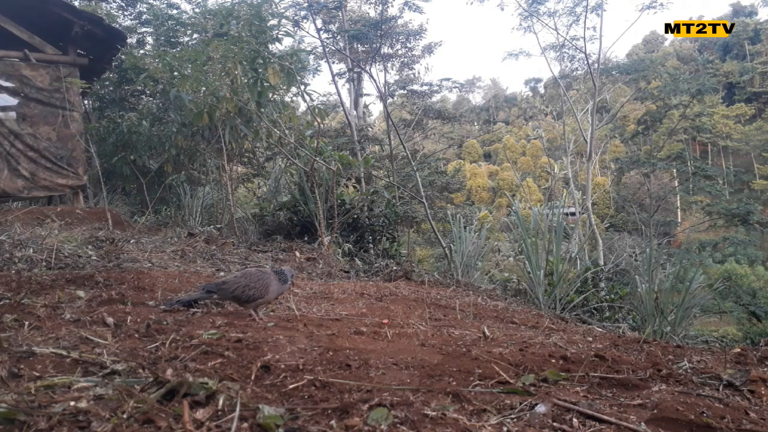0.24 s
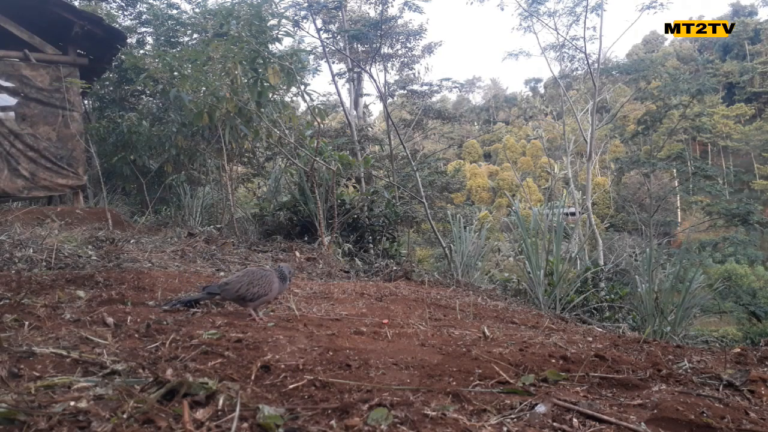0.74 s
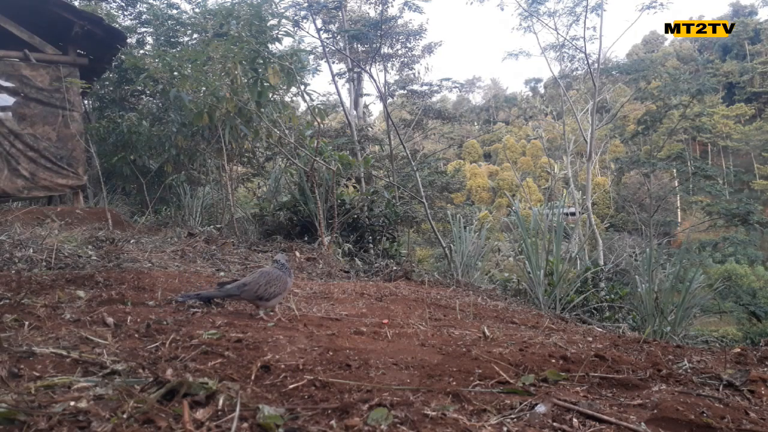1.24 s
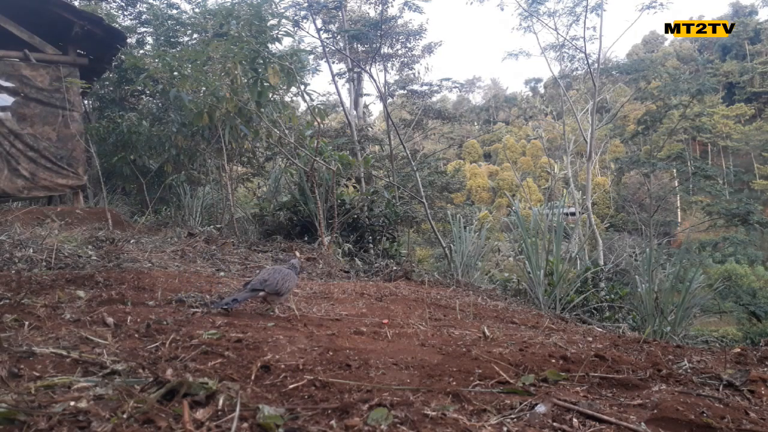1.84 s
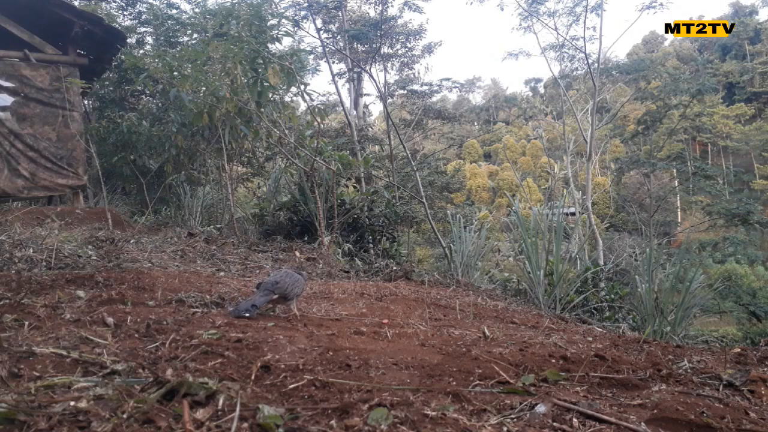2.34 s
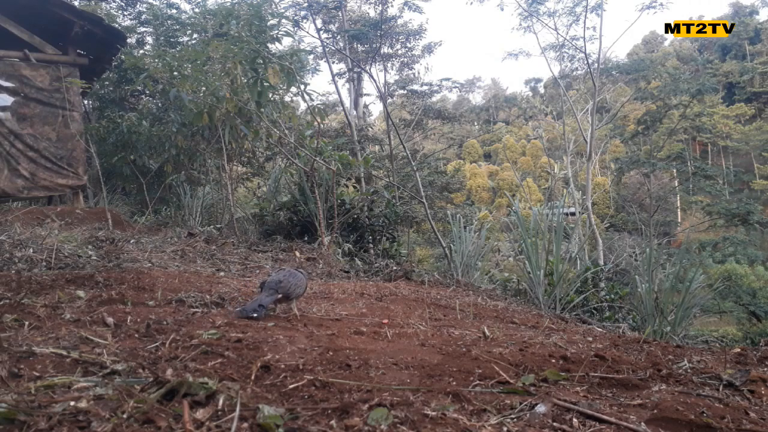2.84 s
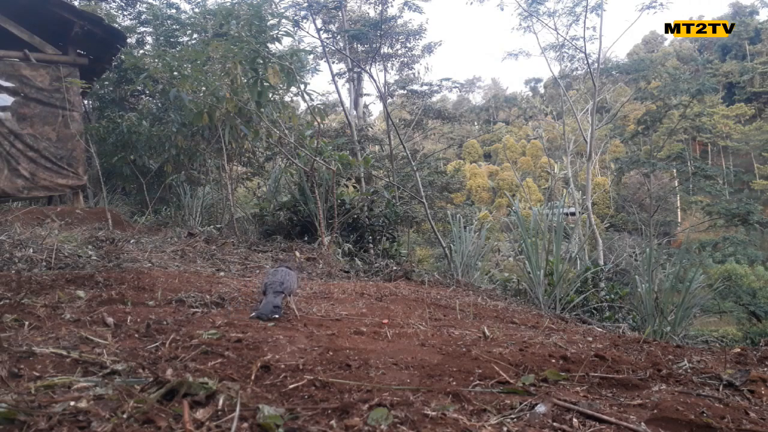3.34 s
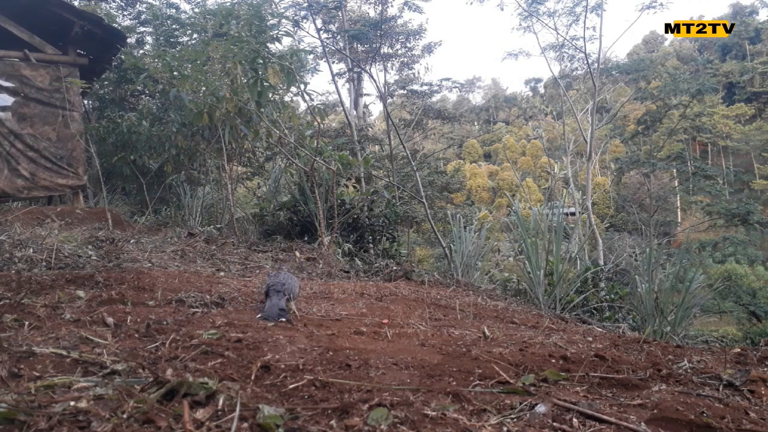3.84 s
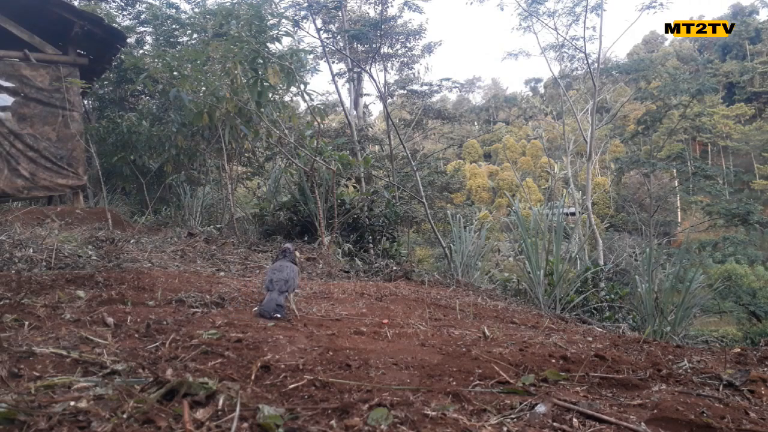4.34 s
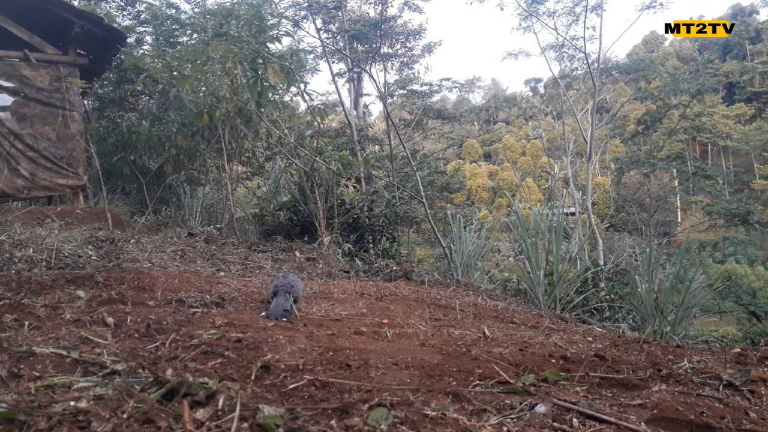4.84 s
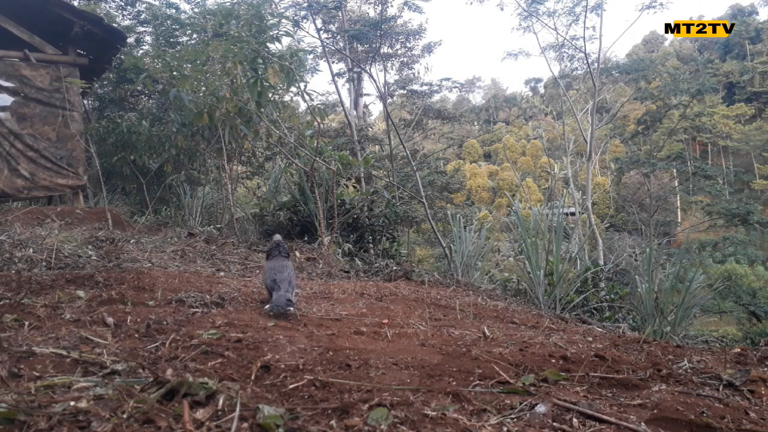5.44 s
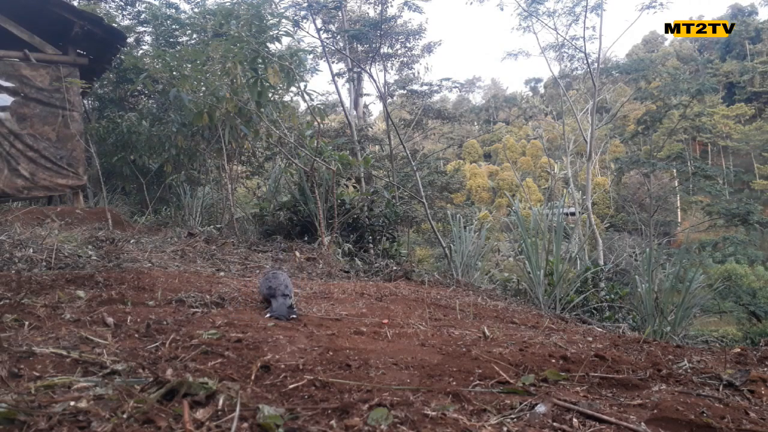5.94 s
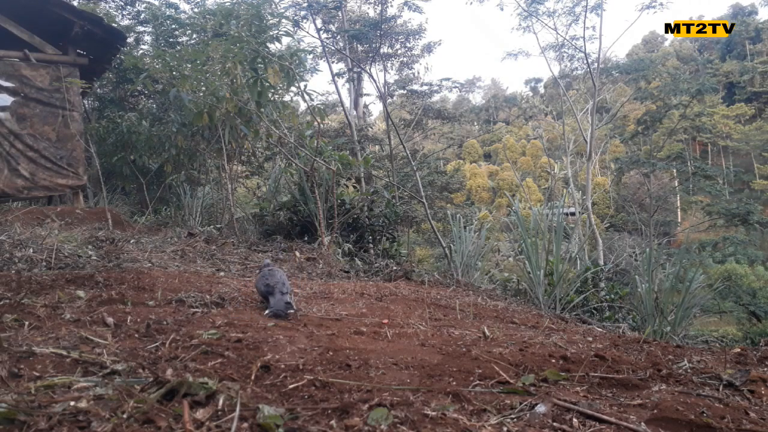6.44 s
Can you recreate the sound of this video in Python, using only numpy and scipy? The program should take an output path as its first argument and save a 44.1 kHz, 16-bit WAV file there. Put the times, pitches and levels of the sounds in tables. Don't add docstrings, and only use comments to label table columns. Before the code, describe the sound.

A dove close by coos in throbbing, falling notes while a motorcycle thumps away into a valley, with faint insects and bird whistles behind.

```python
import sys
import numpy as np
from scipy import signal
from scipy.fft import rfft, irfft
from scipy.io import wavfile

SR = 44100
rng = np.random.default_rng(int(sys.argv[2]) if len(sys.argv) > 2 else 0)


def bounce(signal):
    frames = np.transpose(np.atleast_2d(signal))
    limited = np.clip(frames, -1, 1)
    pcm = np.round(limited * 32767).astype(np.int16)
    wavfile.write(sys.argv[1], SR, pcm)


def makeup_ratio(level_db):
    decades = np.asarray(level_db, float) / 20
    return 10 ** decades


N = 294588
TIME = np.arange(N) / SR

# f/Hz, level per Hz/dB
AIR_COLOUR = [(30, -31.5), (60, -3.5), (80, -7), (150, 0), (300, -4.5), (450, -4.5), (950, -18),
              (1300, -19.5), (2200, -19.5), (3700, -27.5), (5500, -33), (9800, -39.5), (11000, -44.5),
              (15500, -37)]
# f/Hz, width/Hz, level/dB, swell/dB
BUZZ_BANDS = [(1626, 460, -63, 5), (3100, 580, -64.5, -2.5), (4687, 490, -61.5, 3.5), (6407, 740, -65.5, 4),
              (7890, 590, -70.5, 7.5), (9250, 510, -78.5, -0.5)]
# t/s, level/dB
RING_BURSTS = [(.37, -55), (.469, -59), (.69, -61), (1.19, -55), (1.3, -63), (2.039, -55), (2.25, -61),
               (2.85, -55.5), (3.09, -59), (3.63, -55), (3.749, -57), (3.9, -64), (4.41, -56), (4.5, -55),
               (5.209, -57), (5.34, -53), (5.47, -62), (6.01, -63), (6.158, -55)]
# start/s, end/s, level/dB
CRICKET_PHRASES = [(0, 0.276, -63.5), (.55, 1.196, -65), (1.55, 2.123, -66), (2.452, 3.2, -64),
                   (3.832, 4.36, -65.5), (4.688, 5.12, -64.5), (5.409, 6.022, -65), (6.303, 6.68, -63.5)]
# t/s, level/dB
MOTOR_LEVEL = [(0, -42.5), (.61, -34.5), (1.03, -39.5), (1.3, -43), (1.5, -36.5), (1.82, -44.5),
               (2.0, -43.5), (2.44, -52), (3.2, -56.5), (6.68, -72)]
# t/s, firing rate/Hz
MOTOR_SPEED = [(0, 29.97), (.3, 30.07), (.61, 29.18), (1.03, 30.59), (1.15, 29.63), (1.3, 26.78),
               (1.5, 28.51), (1.62, 27.26), (1.82, 26.19), (2.0, 22.08), (2.19, 20.67), (2.44, 18.5),
               (2.75, 16.0), (6.68, 16.0)]
# t/s, length/s, hook depth/Hz, held f/Hz, last level/dB
BIRD_WHISTLES = [
    (0.065, 0.18, 650, 4020, -52),
    (0.64, .2, 633, 3980, -55.5),
    (1.196, 0.18, 590, 3930, -58.5),
    (1.8, 0.21, 660, 3960, -58.5),
    (2.443, 0.19, 656, 3960, -58.5),
    (3.057, 0.2, 590, 3890, -54.5),
    (3.798, .208, 630, 3920, -54.5),
    (4.46, 0.18, 150, 3890, -57.5),
    (5.141, 0.2, 101, 3870, -56),
    (6.385, 0.2, 410, 3910, -58.5),
]
# t/s, level/dB
BIRD_CHIPS = [(.345, -58), (.95, -60), (1.51, -60), (2.09, -63), (2.74, -59), (3.37, -61), (4.06, -65),
              (5.45, -62)]
# t/s, level/dB
MURMUR_LEVEL = [
    (0, -47.5),
    (4.4, -48.3),
    (5.6, -52),
    (6.68, -53),
]
# f/Hz, width/Hz, level/dB
MURMUR_BANDS = [(480, 45, -4.5), (590, 54, 5), (652, 130, -1.5), (702.6, 32.4, 6), (787, 46, -5)]
# t/s, length/s, start f/Hz, level/dB
FAR_NOTES = [
    (0.985, 0.042, 768, -40),
    (1.06, 0.034, 785, -47),
    (1.255, 0.15, 623, -46.5),
    (1.873, 0.22, 689, -54),
    (2.07, 0.11, 585, -57),
    (3.355, 0.1, 645, -49.5),
    (3.704, 0.19, 642, -45),
    (4.3, 0.36, 488, -56.5),
    (4.497, 0.23, 651, -52),
    (5.55, 0.17, 500, -60),
]
# kind, start/s, length/s, top f/Hz, loudest level/dB, flutter stops at/share of note
NEAR_NOTES = [("rise", .065, .216, 731, -20.5, 0.392), ("roll", .395, 0.427, 780, -22.5, .52),
              ("blip", 2.165, 0.122, 746, -25, 0.87), ("hook", 2.33, 0.1758, 738, -22, 0.519),
              ("purr", 2.63, 0.5227, 744, -24, .79), ("trill", 3.512, .174, 722, -25, 0.903),
              ("duet", 3.79, .376, 722, -23, 0.95), ("trill", 4.645, .185, 727, -25, 0.85),
              ("sigh", 4.932, .538, 741, -22.5, 1), ("trill", 5.855, .169, 725, -26, 0.97),
              ("sigh", 6.128, 0.54, 735, -23, 1)]
COO_PITCH = {"rise": (.54, 1.1, .62, 2.25), "hook": (0.546, 0.71, 0.555, 5.8),
             "roll": (.09, 3.37, .56, .62), "blip": (0.398, 1.06, 0.46, 0.74),
             "purr": (0.0622, 1.3, 0.062, 3.6), "trill": (.18, .8, .4, 4.5),
             "duet": (0.138, 0.777, .5, 2.6), "sigh": (.08, 1.7, .18, 1.2)}
COO_LEVEL = {"rise": (.03, .8, 13, 14), "hook": (.03, 0.79, 15.6, 1.3), "roll": (.045, .75, 4, 14),
             "blip": (.03, .4, 2.1, 20), "purr": (.032, .8, 4, 9), "trill": (0.021, 1, 3.1, .8),
             "duet": (0.033, 0.77, 4.4, 11.4), "sigh": (.028, .42, 2.2, 17)}
COO_FLUTTER = {"rise": (62, 66, .7, .1, 0), "hook": (66, 72, .8, .12, 0), "roll": (60, 70, .8, .2, 0),
               "blip": (75, 60, .7, .15, 0), "purr": (66, 95, .64, .4, 0), "trill": (76, 91, .78, .17, 0),
               "duet": (132, 95, .45, .08, 1), "sigh": (85, 75, .14, .14, 0)}
# first/s, last/s, mean closure/0-1
VALVE_CATCHES = [(.698, .7, .7), (3.09, 3.092, .7), (3.906, 3.98, .5), (4.031, 4.115, .55),
                 (4.97, 4.991, .5), (5.012, 5.045, .25), (5.064, 5.085, .8), (5.1, 5.135, .35),
                 (5.184, 5.38, .75), (6.176, 6.2, .5), (6.225, 6.25, .25), (6.27, 6.272, .6),
                 (6.308, 6.49, .75), (6.515, 6.61, .45)]


def rms_one(x):
    return x / np.sqrt(np.mean(x ** 2) + 1e-20)


def noise():
    return rng.standard_normal(N)


def over_time(rows):
    s, value = np.transpose(rows)
    return np.interp(TIME, s, value)


def drift(rate_hz):
    knots = rng.standard_normal(int(N / SR * 60))
    memory = np.exp(-2 * np.pi * rate_hz / 50)
    slow = signal.lfilter([1], [1, -memory], knots)[50:]
    return np.interp(TIME * 50, np.arange(len(slow)), rms_one(slow))


def resonate(x, hz, width_hz):
    r = np.exp(-np.pi * width_hz / SR)
    top = np.array([1, 0, -1]) * (1 - r * r) / 2
    return signal.lfilter(top, [1, -2 * r * np.cos(2 * np.pi * hz / SR), r * r], x)


def resonate_twice(x, hz, width_hz):
    return resonate(resonate(x, hz, width_hz), hz, width_hz)


def band(x, order, low_hz, high_hz):
    return signal.sosfilt(signal.butter(order, [low_hz, high_hz], "band", fs=SR, output="sos"), x)


def echoes(x, taps):
    return sum(makeup_ratio(db) * np.concatenate([np.zeros(int(s * SR)), x])[:N] for s, db in taps)


def air():
    hz = np.maximum(np.fft.rfftfreq(N, 1 / SR), 10)
    colour_hz, colour_db = np.transpose(AIR_COLOUR)
    colour = makeup_ratio(np.interp(np.log(hz), np.log(colour_hz), colour_db))
    return makeup_ratio(-51.5 + 0.25 * drift(2.7)) * rms_one(irfft(rfft(noise()) * colour, N))


def cicada():
    first_drop_s, round_s, ring_hz, ring_rest_db = .43, .813, 2926, -69
    round_share = (TIME - first_drop_s) / round_s % 1
    swell = np.interp(round_share, [0, .35, .82, 1], [0, .6, 1, 0])
    buzz = np.zeros(N)
    for hz, width_hz, db, swell_db in BUZZ_BANDS:
        width_hz = max(width_hz, hz / 16)
        low = rms_one(resonate_twice(noise(), 0.963 * hz, width_hz))
        high = rms_one(resonate_twice(noise(), 0.9935 * hz, width_hz))
        climbing = np.sqrt(1 - swell) * low + np.sqrt(swell) * high
        buzz += makeup_ratio(db - swell_db * (1 - swell)) * climbing
    bursts = makeup_ratio(ring_rest_db) + sum(makeup_ratio(db) * np.exp(-((TIME - s) / 0.035) ** 2) for s, db in RING_BURSTS)
    phase = 2 * np.pi * np.cumsum(ring_hz + 9 * drift(6)) / SR
    ring = np.sin(phase) + makeup_ratio(-10.5) * np.sin(phase / 2)
    return buzz + np.sqrt(2) * bursts * makeup_ratio(2.2 * drift(14)) * ring


def cricket():
    chirp_turn = 2 * np.pi * 18.7 * TIME
    phrases = np.zeros(N)
    for start, end, db in CRICKET_PHRASES:
        growth = np.clip(.5 + (TIME - start) / 0.3, 0, 1)
        phrases += makeup_ratio(db) * (TIME > start) * (TIME < end) * growth
    chirps = np.clip(np.cos(chirp_turn) + 0.33, 0, 1)
    strokes = chirps * np.clip(np.cos(3 * chirp_turn) + 1.3, 0, 1)
    return phrases * rms_one(resonate_twice(noise() * strokes, 4660, 350))


def motorcycle():
    hidden_db, hiding_db, open_echo = -39.5, 6, 0.1
    level_db = over_time(MOTOR_LEVEL)
    wet = np.clip(open_echo + (hidden_db - level_db) / hiding_db, open_echo, 1)
    turns = np.cumsum(over_time(MOTOR_SPEED)) / SR + .27 + .009 * drift(20)
    fired = np.diff(np.floor(turns), prepend=0) * makeup_ratio(1.1 * noise())
    puff = band(fired + 1e-18, 2, 105, 560)
    thump = resonate(resonate(puff, 210.6, 120), 185, 200) + makeup_ratio(-12.5) * resonate(puff, 413, 140)
    late = echoes(thump, [(.0078, 0), (.0155, -3), (.0225, -11), (.029, -6)])
    late += makeup_ratio(0.5) * resonate(puff, 150, 35)
    wash = .35 * rms_one(resonate_twice(noise(), 190, 170))
    rattle = rms_one(resonate(resonate(noise(), 1700, 1300), 2050, 1300))
    rattle *= 1 + 0.24 * np.cos(2 * np.pi * turns)
    rattle_db = np.maximum(-57.5 - 7 * TIME, -84)
    return makeup_ratio(level_db) * (rms_one(thump + wet * late) + wet * wash) + makeup_ratio(rattle_db) * rattle


def small_bird():
    hook_hz_per_s, waver_hz = 24000, 14
    out, waver = np.zeros(N), waver_hz * drift(20)
    for s, length, hook_hz, held_hz, db in BIRD_WHISTLES:
        i, t = int(s * SR), np.arange(int(length * SR)) / SR
        hook = hook_hz * np.clip(1 - t / (hook_hz / hook_hz_per_s), 0, 1) ** 1.1
        end_flick = 45 * np.exp((t - length) / 0.015)
        hz = held_hz + 25 * (t / length - 1) - hook + end_flick + waver[i:i + len(t)]
        level_db = db - 13.3 * (1 - t / length) + 12.0 * np.exp(-t / 0.011)
        fade = np.clip(np.minimum(t, length - t) / 0.0013, 0, 1)
        whistle = np.sin(2 * np.pi * np.cumsum(hz) / SR)
        out[i:i + len(t)] += np.sqrt(2) * fade * makeup_ratio(level_db) * whistle
    share = np.linspace(0, 1, int(0.034 * SR))
    chip_hz = 2450 + 850 * np.sin(2.1 * share)
    chip = np.sin(2 * np.pi * np.cumsum(chip_hz) / SR) * np.sin(np.pi * share)
    for s, db in BIRD_CHIPS:
        i = int(s * SR)
        out[i:i + len(share)] += np.sqrt(2) * makeup_ratio(db) * chip
    out *= makeup_ratio(3.0 * drift(20))
    return out + echoes(out, [(.031, -17), (.074, -15), (.118, -25.5), (.171, -17)])


def far_doves():
    sag_hz_per_s = 130
    voices, notes = np.zeros(N), np.zeros(N)
    for hz, width_hz, db in MURMUR_BANDS:
        voices += makeup_ratio(db + 2.36 * drift(2.5)) * resonate_twice(noise(), hz, 1.93 * width_hz)
    for s, length, start_hz, db in FAR_NOTES:
        i, share = int(s * SR), np.linspace(0, 1, int(length * SR))
        tone = np.sin(2 * np.pi * np.cumsum(start_hz - sag_hz_per_s * length * share) / SR)
        arch = np.sqrt(np.sin(np.pi * share) + 1e-9)
        notes[i:i + len(share)] += np.sqrt(2) * makeup_ratio(db) * arch * tone
    return makeup_ratio(over_time(MURMUR_LEVEL)) * rms_one(voices) + notes * makeup_ratio(3.3 * drift(20))


def catches():
    gap_s, gap_spread, size_spread = .017, .25, .15
    rows = []
    for first, last, closure in VALVE_CATCHES:
        gaps, sizes = rng.standard_normal((2, 30))
        s = first + np.cumsum(gap_s * np.exp(gap_spread * gaps) * (np.arange(30) > 0))
        closures = np.clip(closure + size_spread * sizes, 0, 1)
        rows += list(np.transpose([s, closures])[s <= last])
    return np.array(rows)


def coo(kind, start, length, top_hz, loud_db, stop_at):
    top_at, climb, droop_at, droop = COO_PITCH[kind]
    attack_s, crest_at, swell_db, fade_db = COO_LEVEL[kind]
    first, last, depth, slip, twin = COO_FLUTTER[kind]
    rest_hz, pull_hz = 545.4, 55.1
    smooth_depth, smooth_gain_db, settle_s = .06, 1, .015
    at = np.arange(int(start * SR), min(N, int((start + length) * SR)))
    t = at / SR - start
    share = np.clip(t / length, 0, 1)
    flutter_share = share / stop_at
    settled = np.clip((t - stop_at * length) / settle_s + .5, 0, 1)

    level_db = loud_db - 24 * np.clip(1 - t / attack_s, 0, 1) ** 2
    level_db -= swell_db * np.clip(1 - share / crest_at, 0, 1) ** 2
    level_db -= fade_db * np.clip((share - crest_at) / (1 - crest_at), 0, 1) ** 2.3
    level_db -= 26.5 * np.clip(1 - (length - t) / .012, 0, 1)
    level_db += smooth_gain_db * settled

    eased = np.clip(depth * (1 + .3 * (.5 - flutter_share)), 0, 1)
    depth = np.clip(t / attack_s, .3, 1) ** 2 * (eased + (smooth_depth - eased) * settled)
    per_s = first + (last - first) * np.clip(flutter_share, 0, 1)

    tension = np.clip(share / top_at, 0, 1) ** climb
    tension -= np.clip((share - droop_at) / (1 - droop_at), 0, 1) ** droop
    hz = rest_hz + (top_hz - rest_hz - pull_hz * depth) * tension
    return at, hz, level_db, per_s, depth, slip, twin


def near_doves():
    sweep_hz, jitter, uneven, shut_s = 62, 0.17, 0.25, 0.0022
    out, count = np.zeros(N), np.arange(100)
    breath = rms_one(resonate(noise(), 1164, 510))
    caught = catches()
    closure = caught[:, 1]
    jolt = 1.6 * closure * rng.standard_normal(len(caught))
    for note in NEAR_NOTES:
        at, hz, level_db, per_s, depth, slip, twin = coo(*note)
        timing, deepness, loudness, slipping = rng.standard_normal((4, 100))

        away = (TIME[at] - caught[:, :1]) / shut_s
        shut = np.clip(closure @ np.exp(-away ** 2 / 2), 0, 1)
        near = np.exp(-(away / 5.7) ** 2).max(axis=0)
        hz = hz - 29.9 * near * (1 - twin) * np.clip((hz - 545.4) / 170, 0, 1)
        depth = depth * (1 - 0.24 * near)

        loose = 1.15 - depth + 1.34 * slip
        turns = np.cumsum(per_s) / SR
        turns += np.cumsum(per_s * jitter * loose * np.interp(turns, count, timing)) / SR
        depth = np.clip(depth * np.exp(uneven * loose * np.interp(turns, count, deepness)), 0, 1)
        cycle = 2 * np.pi * turns

        upper = twin * np.interp(np.linspace(0, 1, len(at)), [0, .35, .6, 1], [.9, .8, .3, .3])
        depth = depth * (1 - 0.85 * twin)
        hz = hz - per_s * upper ** 2 / (1 + upper ** 2)

        first, second = 1.25 * depth, .14 * depth ** 2
        flutter = 1 - first * np.cos(cycle) + second * np.cos(2 * cycle)
        flutter /= np.sqrt(1 + first ** 2 / 2 + second ** 2 / 2)
        flutter *= (1 - shut) * makeup_ratio(0.6 * np.interp(turns - .5, count, loudness))

        swept_hz = hz - (sweep_hz * depth + 5) * np.sin(cycle) - 110 * shut
        phase = 2 * np.pi * np.cumsum(swept_hz) / SR
        late = turns - .1
        steps = np.floor(late) + np.clip(late % 1 - .8, 0, 1) * 5
        slips = np.gradient(np.interp(steps, count, np.cumsum(slipping)))
        phase += 2 * np.pi * slip * np.cumsum(slips * (depth + twin) ** 2)
        phase += jolt @ np.clip(away / 2 + .5, 0, 1)

        tone = (np.sin(phase) - upper * np.sin(phase + cycle)) / np.sqrt(1 + upper ** 2)
        overtone = makeup_ratio(-19.0) * np.sin(2 * phase)
        hiss = makeup_ratio(-17.5) * (depth + 0.26) * breath[at]
        out[at] += np.sqrt(2) * makeup_ratio(level_db) * flutter * (tone + overtone + hiss)
    crop = band(out, 3, 490, 900) + makeup_ratio(-25) * out
    return crop + echoes(crop, [(.009, -33.5), (.023, -23.5), (.047, -30.5), (.083, -35.5)])


def scene():
    background = air() + cicada() + cricket() + motorcycle()
    return (background + small_bird() + far_doves() + near_doves())[None]


def band_limit(x):
    return signal.sosfilt(signal.butter(12, 15620, fs=SR, output="sos"), x)


def record(dry):
    cut = signal.sosfilt(signal.cheby2(12, 60, 16100, fs=SR, output="sos"), dry)
    return band_limit(cut - .0006)


dry = scene()
out = record(dry)
bounce(out)
```